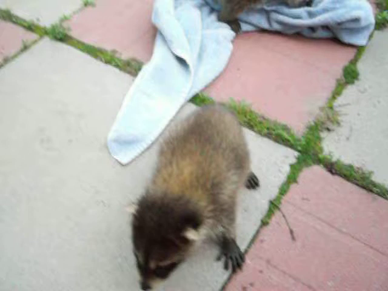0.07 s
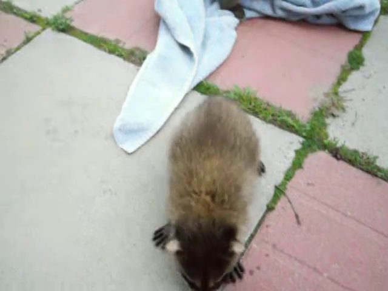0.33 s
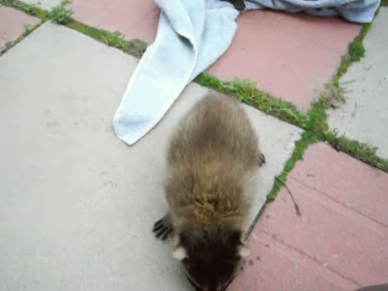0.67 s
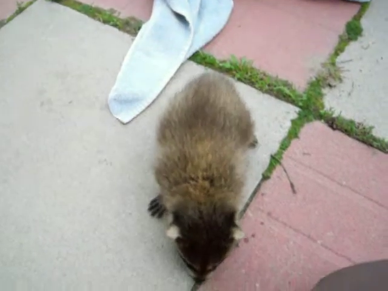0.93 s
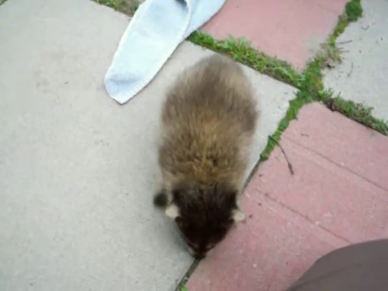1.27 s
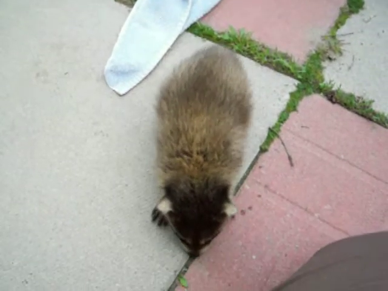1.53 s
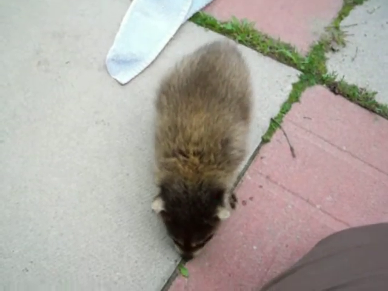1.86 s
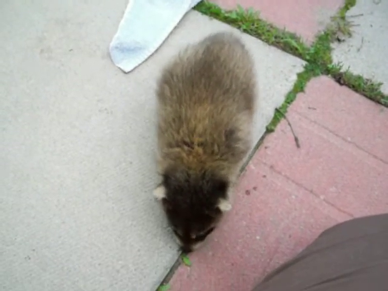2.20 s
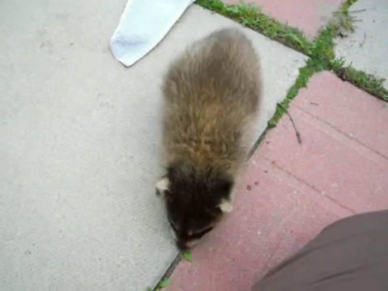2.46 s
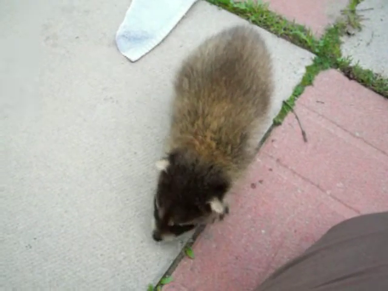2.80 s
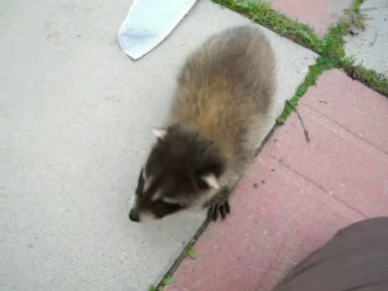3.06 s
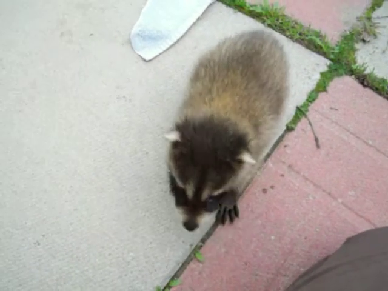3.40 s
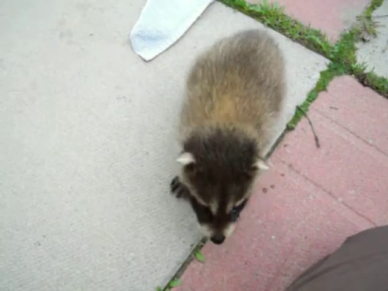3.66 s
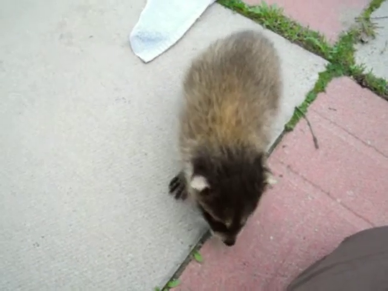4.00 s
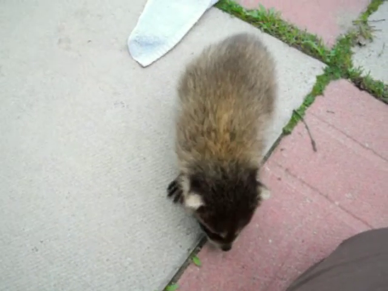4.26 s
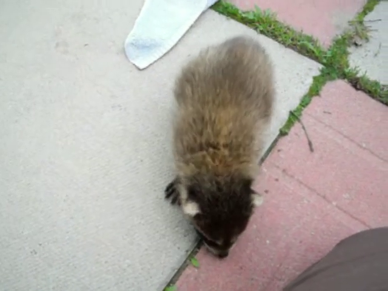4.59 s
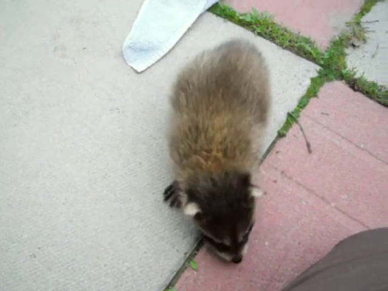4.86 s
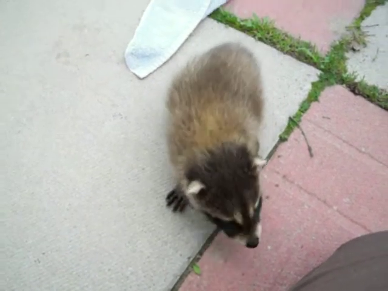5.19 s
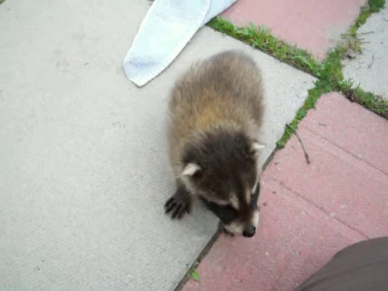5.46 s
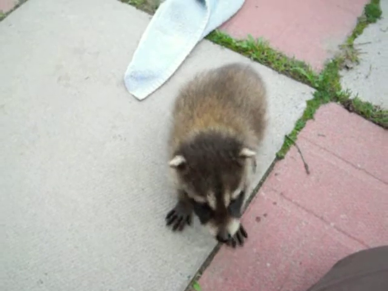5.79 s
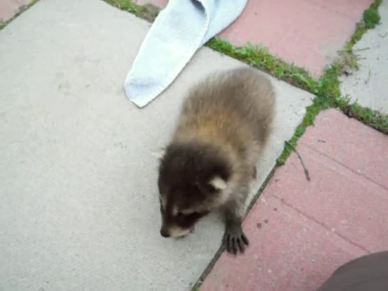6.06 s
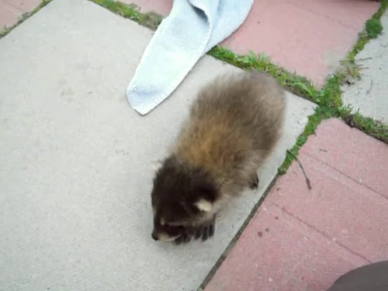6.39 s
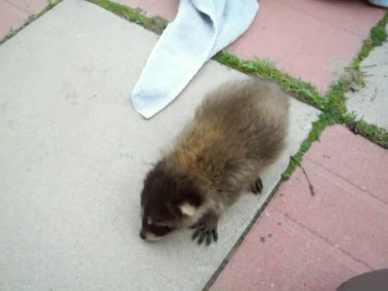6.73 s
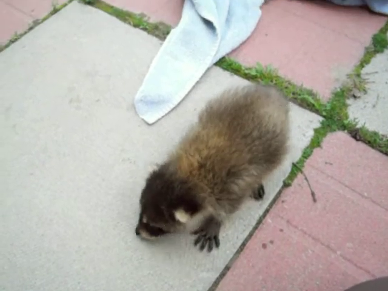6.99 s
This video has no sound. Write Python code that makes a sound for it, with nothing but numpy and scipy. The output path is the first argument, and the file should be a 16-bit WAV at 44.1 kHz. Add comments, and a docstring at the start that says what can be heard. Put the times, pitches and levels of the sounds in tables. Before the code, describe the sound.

On a paved patio, a young raccoon close to the microphone stays mostly quiet, with only an occasional light tap of a paw, then chitters in three short, rapid runs of raspy squeaks. Two dull, gritty pulses follow the first run. Before that, after an opening pop and short crackling buzz, there is mainly low rumble, hiss and faint hum, with a distant engine picking up speed and settling into a drone.

```python
"""On a paved patio, a young raccoon close to the microphone chitters in three quick bursts.
Each chirp is a squeak of about 20 ms near 1 kHz: its vocal folds flap hoarsely, then lock into a tone.
Two short, dull, gritty pulses trail off the first burst; three lone taps come from its steps.
A far engine speeds up and drones over low rumble, hum and hiss.
The recorder pops and buzzes briefly as it switches on."""
import sys
import numpy as np
from scipy import signal
from scipy.fft import rfft, irfft, next_fast_len
from scipy.io import wavfile
from scipy.ndimage import uniform_filter1d

SR = 44100
rng = np.random.default_rng(int(sys.argv[2]) if len(sys.argv) > 2 else 0)


def transcribe(signal):
    """Save signal, clipped to [-1, 1], as a 16-bit WAV file at the path in sys.argv[1]."""
    frames = np.atleast_2d(signal).T
    limited = np.clip(frames, -1, 1)
    pcm = np.round(limited * 32767).astype(np.int16)
    wavfile.write(sys.argv[1], SR, pcm)


N = 319725
TIME = np.arange(N) / SR
SWITCH_ON_S, INPUT_BAND_HZ = .0725, 5370

# chirps: (time [s], length [s], pitch [Hz], glide [share of pitch], hoarse lead-in [share of length],
# level [dB], octave [relative dB], upper overtones and breath [relative dB])
CHIRP_CALLS = [ (5.68, 0.013, 1082, -0.25, 0.08, -35.5, -6.5, -9),
               (5.725, 0.023, 971, 0.045, .2, -34, -2.5, -8), (5.775, 0.028, 879, 0, .14, -31.5, -9.5, -10),
               (5.825, .030, 795, -0.017, .52, -35, -12, -15),
               (5.891, .014, 790, 0.086, .12, -48, -24, -18),
               (6.241, .021, 1030, -0.18, 0.17, -32.5, -16.5, -14),
               (6.2924, 0.021, 931, 0.16, 0.1, -24, -15, -19.5),
               (6.336, .022, 943, 0.012, 0.54, -31.5, -20, -22.5),
               (7.085, .022, 1000, .2, 0.051, -25.5, -11.5, -19),
               (7.135, 0.027, 982, 0.00071, 0.48, -23, -16.5, -25),
               (7.193, 0.025, 911, 0.028, 0.37, -21.5, -17.5, -25),
               (7.243, 0.024, 910, 0.093, 0.5, -26, -16, -26)]
# response of the mouth, colouring harmonics 3 to 6: (frequency [Hz], gain [dB])
MOUTH_RESPONSE = [(2400, -20.5), (2900, -1.5), (3600, 1), (4200, -6.5), (5000, 2.5), (6000, -7)]
# three lone taps and, near 5.9 s, two dull, gritty pulses trailing off the first burst of chitter:
# (time [s], peak level [dB], ring frequency [Hz], grit [0-1])
SHORT_PULSES = [(1.648, -28.5, 750, 1), (5.374, -35, 3300, 0), (5.886, -28, 646, 0.5),
                (5.936, -33.5, 450, .5), (6.742, -26.5, 324, .4)]
# the engine speeds up, then cruises: (time [s], firing rate [Hz])
FIRING_RATE = [(1.6, 54), (2.0, 57.62), (2.6, 68.35), (3.0, 70.1), (3.25, 70.36), (5.05, 72.02),
               (6.1, 70.7), (6.8, 69.53), (7.25, 70.17)]
# engine orders 2, 3, 4 and 6, slowly turning duller: (base level on reaching cruise [dB], drift [dB/s])
ENGINE_ORDERS = [(-53.5, 1.73), (-58.5, 0.44), (-59, -0.49), (-69.5, -3)]
# resonances that lift an order passing through: (frequency [Hz], half width at 1/e [Hz], lift [dB])
ORDER_RESONANCES = [(139.5, 3.4, 3), (211.1, 3.6, 6.5), (282.33, 4.9, 11), (416.5, 6, 13.5)]
# outdoor rumble: (frequency [Hz], relative spectral density [dB])
RUMBLE_SPECTRUM = [(8.8, -29.5), (15, -8), (22, -1.5), (48, 3.5), (113, -4.5), (141, -9.5), (167, -8.5),
                   (241, -14.5), (314, -16.5), (600, -27), (780, -50.5), (1320, -120)]
# even hiss: (frequency [Hz], relative spectral density [dB])
HISS_SPECTRUM = [(250, -4), (500, 4), (900, 3), (1400, 0.5), (2500, -1), (4000, -2), (5000, -5),
                 (5400, -9.5), (5800, -19.5), (6200, -38)]


def chirp(length, pitch_hz, glide, lead_in, level_db, octave_db, upper_db,
          arch=.08, jitter=.14, shimmer=.7, rasp_hz=520, lead_db=-11):
    """Self-sustained oscillation: the vocal folds flap weakly at first, then lock into a full tone."""
    size = round(length * SR)
    progress = np.linspace(0, 1, size)
    loose = 1 / (1 + np.exp((progress - lead_in) / .065))   # falls from 1 to 0 as the folds lock
    roughness = (.15 + .3 * lead_in) * (.5 + loose)
    pitch = pitch_hz * (1 + glide * (progress - .5) - arch * (2 * progress - 1) ** 2)
    # the pitch strains upward just before the lock and drops back as the folds catch
    pitch *= 1 + .34 * lead_in * np.exp(-((progress - lead_in) / .13 + .87) ** 2)
    phase = 2 * np.pi * np.cumsum(pitch * (1 + jitter * roughness * flutter(rasp_hz, size))) / SR
    tone = np.sin(phase) + from_db(octave_db) * np.sin(2 * phase)
    upper = sum(from_db(at_hz(MOUTH_RESPONSE, k * pitch)) * np.sin(k * phase) for k in range(3, 7))
    # strong and weak cycles alternate in a hoarse chirp, and air puffs out with each opening
    half_harmonic = from_db(-8) * roughness * np.sin(1.5 * phase)
    breath = from_db(upper_db - 5) * rng.standard_normal(SR)[:size] * (1 + np.sin(phase))
    voiced = from_db(lead_db * loose) * (tone + half_harmonic + .5 * from_db(upper_db) * upper)
    swell = np.abs(np.sin(np.pi * progress)) ** .31
    flicker = 1 + shimmer * roughness * flutter(rasp_hz, size)
    return np.sqrt(2) * from_db(level_db) * swell * flicker * (voiced + breath)


def raccoon():
    """Pulsed phonation: within a burst, chirps follow at about nineteen a second."""
    out = np.zeros(N)
    for start_s, *shape in CHIRP_CALLS:
        add(out, start_s, chirp(*shape))
    return out


def pulses(decay_s=.00089):
    """Damped oscillation: a low, noisy ring sounds dull and gritty, a high, clean one ticks."""
    out, t = np.zeros(N), TIME[:SR // 50]
    for start_s, peak_db, ring_hz, grit in SHORT_PULSES:
        noise = grit * rms_one(lowpass(rng.standard_normal(len(t)), 3 * ring_hz))
        ring = np.cos(2 * np.pi * ring_hz * t)
        pulse = lowpass(np.exp(-t / decay_s) * (ring + noise), 1.7 * ring_hz)
        add(out, start_s, -from_db(peak_db) * pulse / np.abs(pulse).max())
    return out


def patio(direct, echo_db=-19, t60_s=.1, delay_s=.00046):
    """Scattering: the slabs and things nearby add faint echoes to the direct sound."""
    t = TIME[:SR // 5]
    echoes = rng.standard_normal(len(t)) * from_db(-60 * t / t60_s) * (t > delay_s)
    return direct + from_db(echo_db) * signal.fftconvolve(direct, echoes / np.linalg.norm(echoes))[:N]


def engine(wobble=.0024, throb_db=2.5, load_db=8.5, full_load_hz_per_s=26, cruise_s=2.97):
    """Harmonics of the firing rate: only low orders carry this far, swelling under load and at resonance."""
    rate = np.interp(TIME, *np.transpose(FIRING_RATE))
    phase = 2 * np.pi * np.cumsum(rate * (1 + wobble * flutter(9, N))) / SR
    acceleration = uniform_filter1d(np.gradient(rate) * SR, size=SR // 4)
    load = np.clip(acceleration / full_load_hz_per_s, 0, 1)
    drone = 0
    for k, (cruise_db, db_per_s) in zip((2, 3, 4, 6), ENGINE_ORDERS):
        base_db = cruise_db + db_per_s * (TIME - cruise_s)
        lift_db = sum(db * np.exp(-((k * rate - hz) / width) ** 2) for hz, width, db in ORDER_RESONANCES)
        level_db = base_db + lift_db + load_db * load + throb_db * flutter(10, N)
        drone += from_db(level_db) * np.sin(k * phase)
    fade_in = np.interp(TIME, [1.5, 1.95], [0, 1])
    return np.sqrt(2) * drone * fade_in


def rumble(start_db=-41, rise_db_per_s=.3767, swell_db=.5):
    """Low-frequency outdoor noise whose level wanders a little and slowly rises."""
    level_db = start_db + rise_db_per_s * TIME + swell_db * flutter(4.5, N)
    return from_db(level_db) * coloured_noise(RUMBLE_SPECTRUM)


def hum(hz=240.3, level_db=-56.5, waver_db=3):
    """Random amplitude and phase modulation make a faint tone waver."""
    amplitude = np.sqrt(2) * from_db(level_db + waver_db * flutter(6.8, N))
    return amplitude * np.sin(2 * np.pi * hz * TIME + .69 * flutter(2, N))


def hiss(level_db=-49, wake_s=.38, rise_db_per_s=117, overshoot_db=5, settle_s=.023):
    """Broadband noise that fades in as the input wakes, overshoots and settles to a steady state."""
    since = TIME - wake_s
    fade_db = rise_db_per_s * np.minimum(since, 0)
    excess_db = overshoot_db * np.exp(-np.maximum(since, 0) / settle_s)
    return from_db(level_db + fade_db + excess_db) * coloured_noise(HISS_SPECTRUM)


def switch_on(jump=.32, hold_s=.29, settle_s=.098, buzz_hz=78, buzz_db=-35, step=.016, dither=.0015):
    """Step transient: the input's offset pops, hunts in a coarse, crackling sawtooth, then drains away."""
    since = TIME - SWITCH_ON_S
    offset = -jump * np.exp(-np.maximum(since - hold_s, 0) / settle_s)
    cycles = np.cumsum(buzz_hz * (1 + .15 * flutter(40, N))) / SR
    sawtooth = from_db(buzz_db + 2 * flutter(60, N)) * (2 * (cycles % 1) - 1)
    stairs = step * np.round((sawtooth + dither * flutter(4000, N)) / step)
    return offset + lowpass(stairs * (since < hold_s), INPUT_BAND_HZ, order=14)


def from_db(db):
    """Decibels to amplitude ratio."""
    return 10 ** (np.asarray(db) / 20)


def rms_one(x):
    """Normalisation to unit power."""
    return x / np.sqrt(np.mean(x ** 2) + 1e-20)


def at_hz(spectrum, hz):
    """Interpolation of a spectrum on a log-frequency axis."""
    known_hz, db = np.transpose(spectrum)
    return np.interp(np.log(hz + 1e-3), np.log(known_hz), db)


def lowpass(x, hz, order=2):
    """Maximally flat low-pass filter."""
    return signal.sosfilt(signal.butter(order, min(hz, .45 * SR), fs=SR, output="sos"), x)


def flutter(rate_hz, size):
    """Random modulation: values of unit variance joined by straight lines."""
    knots = rng.standard_normal(4096)
    return np.interp(np.arange(size) * rate_hz / SR, np.arange(len(knots)), knots)


def coloured_noise(spectrum):
    """Spectral shaping of white noise, at unit power, with nothing above the spectrum's last point."""
    size = next_fast_len(N)
    hz = np.arange(size // 2 + 1) * SR / size
    gain = from_db(at_hz(spectrum, hz)) * (hz < spectrum[-1][0])
    return rms_one(irfft(rfft(rng.standard_normal(size)) * gain, size)[:N])


def add(track, start_s, sound):
    """Superposition of a sound on the track from start_s on."""
    start = min(round(start_s * SR), N)
    track[start:start + len(sound)] += sound[:N - start]


def scene():
    """Superposition of the near animal, dulled by a small microphone, and the background."""
    near = lowpass(patio(raccoon() + pulses()), INPUT_BAND_HZ, order=20)
    return (near + engine() + rumble() + hum() + hiss())[None]


def record(dry, stopband_hz=17000):
    """Gating and band limiting: sound begins with the switch-on pop, and the top treble is cut."""
    live = (dry + switch_on()) * (TIME >= SWITCH_ON_S)
    treble_cut = signal.cheby2(12, 70, stopband_hz, fs=SR, output="sos")
    return signal.sosfilt(treble_cut, live)


dry = scene()
out = record(dry)
transcribe(out)
```